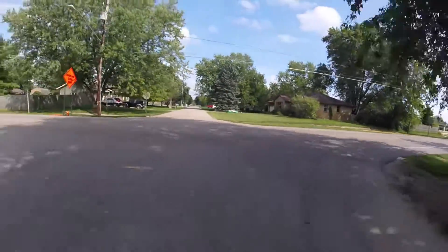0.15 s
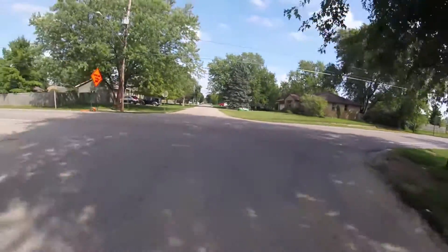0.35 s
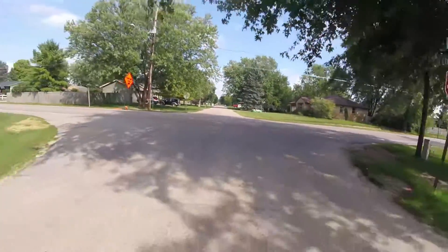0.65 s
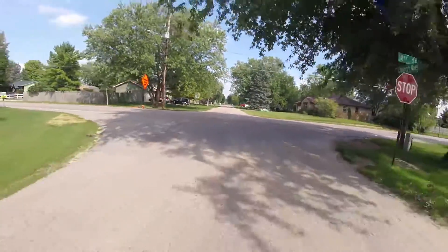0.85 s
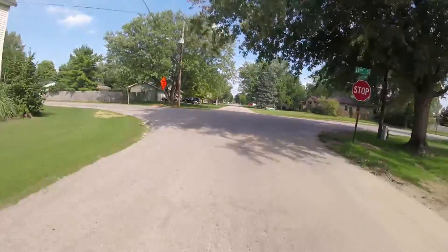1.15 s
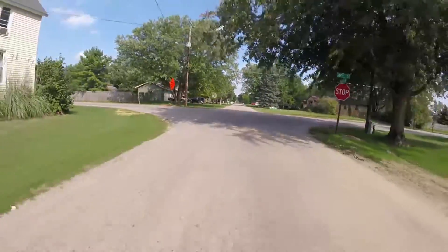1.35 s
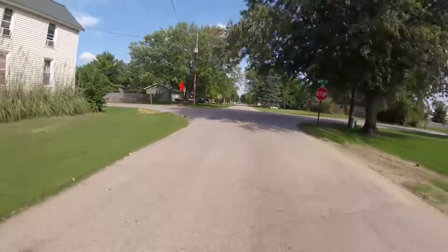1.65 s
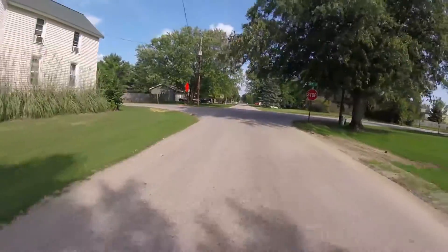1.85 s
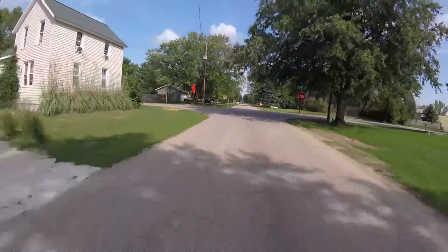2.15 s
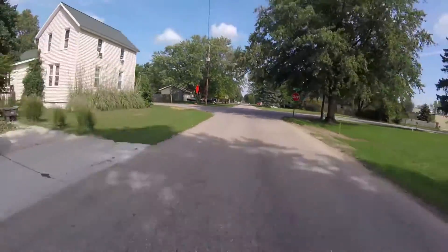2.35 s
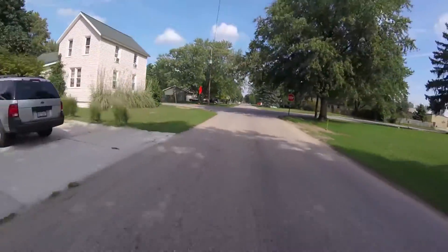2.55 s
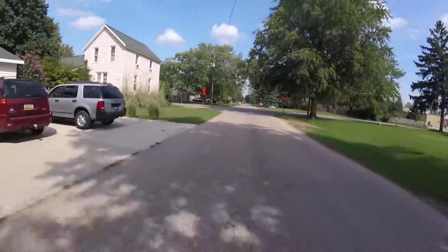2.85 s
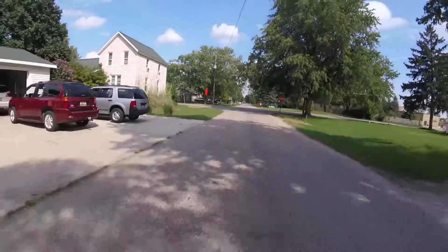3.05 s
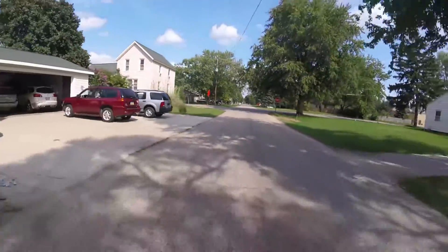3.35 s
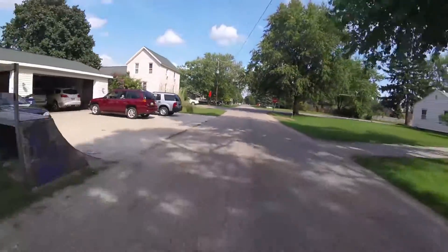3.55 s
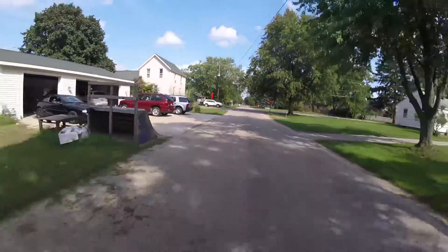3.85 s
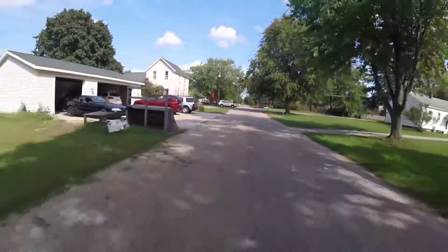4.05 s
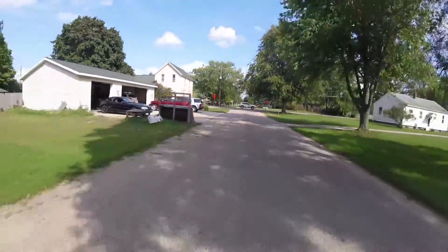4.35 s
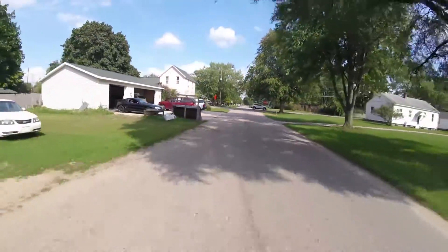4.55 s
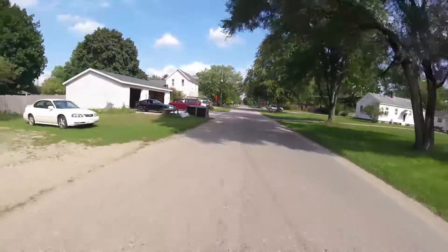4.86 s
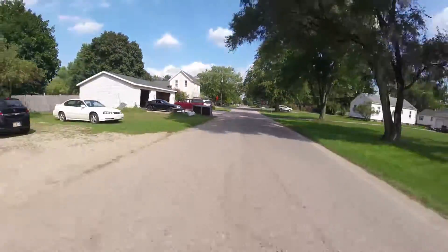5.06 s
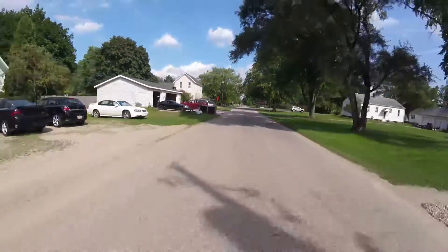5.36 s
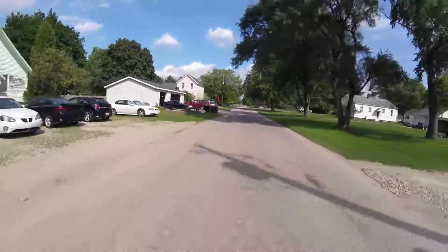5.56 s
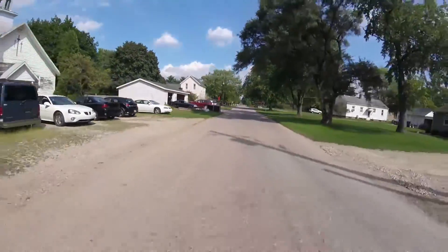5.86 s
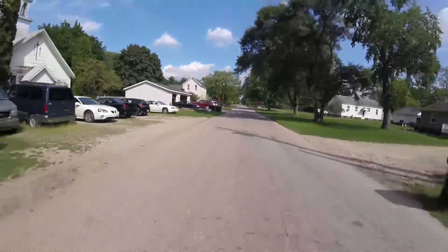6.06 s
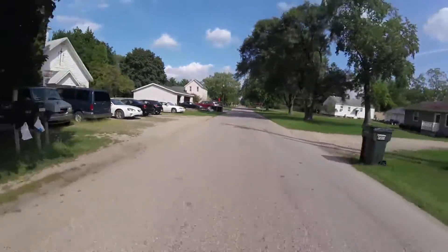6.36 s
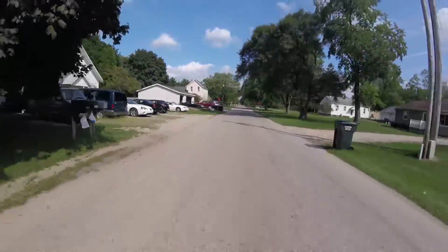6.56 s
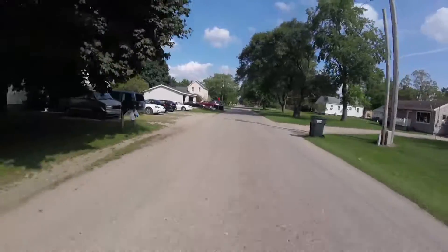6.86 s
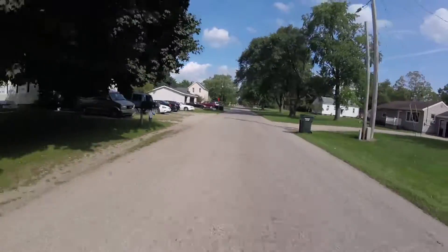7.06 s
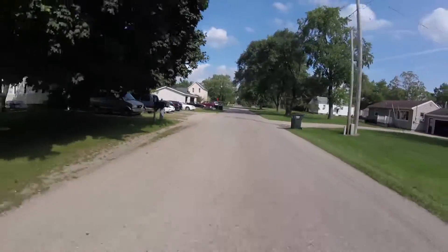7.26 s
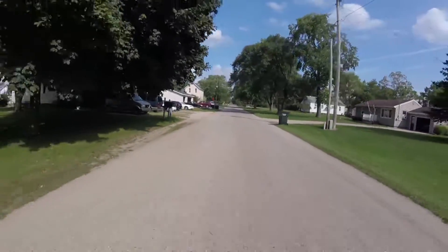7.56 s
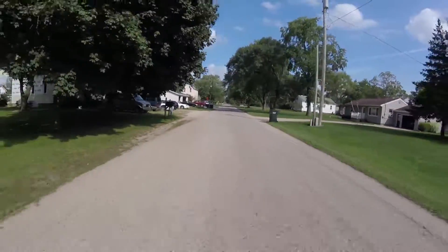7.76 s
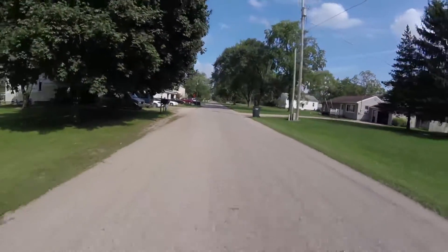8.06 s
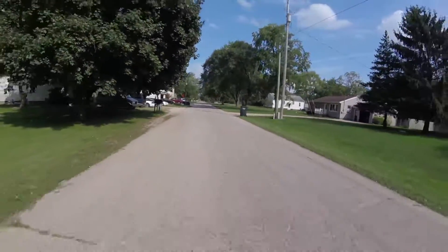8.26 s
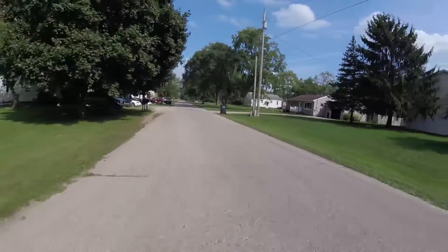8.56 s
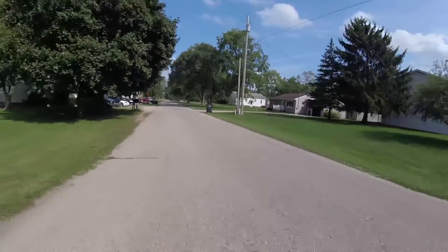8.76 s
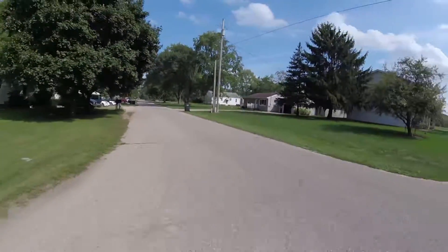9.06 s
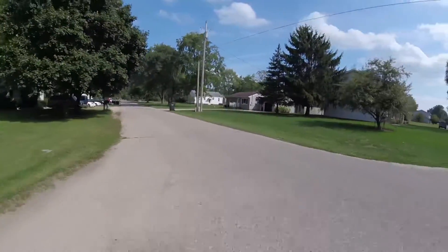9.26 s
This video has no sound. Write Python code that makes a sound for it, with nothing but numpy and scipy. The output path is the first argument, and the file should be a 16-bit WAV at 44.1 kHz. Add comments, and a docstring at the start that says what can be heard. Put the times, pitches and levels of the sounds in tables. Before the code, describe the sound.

Microphone just above a car's sports muffler outdoors: low throbbing booms with a raspy uneven bark climb in pitch, then suddenly lose force as the driver lifts off. A mellow hum returns and gradually falls lower, nearly fading before a last touch of throttle. Low wind buffeting, steady tyre roar, fine hiss and soft bumps run beneath; a few tiny chirps are barely audible.

```python
"""A village road, heard close behind the tail of a four-cylinder car and just above its sports muffler.
Each firing sends a puff down the pipe: harmonics of the firing rate boom and grow under load.
One cylinder cracks once a cycle; the throttle shuts with a sigh of air, the engine burbles down and
picks up again. Shaped noise gives tyres, wind, hiss, whirr and small bumps; sliding sines give birds."""
import sys
import numpy as np
from scipy import signal
from scipy.fft import rfft, irfft, next_fast_len
from scipy.io import wavfile
from scipy.ndimage import map_coordinates

SR = 44100
rng = np.random.default_rng(int(sys.argv[2]) if len(sys.argv) > 2 else 0)


def digitize_waveform(pressure):
    """Quantize a signal to 16-bit integers and store it at the path in sys.argv[1].

    Rows of a 2-D input are taken as channels; values are limited to [-1, 1].
    """
    field = np.atleast_2d(pressure).T
    bounded = np.clip(field, -1, 1)
    quanta = np.round(bounded * 32767).astype(np.int16)
    wavfile.write(sys.argv[1], SR, quanta)


N = 414960


def amp(db):
    """Logarithmic level: decibels to amplitude gain."""
    return 10 ** (np.asarray(db) / 20)


def unit(x):
    """Normalisation: scale to an rms of 1."""
    return x / np.sqrt(np.mean(x ** 2) + 1e-20)


def clock():
    """Sampling: the time of every sample in seconds."""
    return np.arange(N) / SR


def curve(rows):
    """Linear interpolation: one value per sample from (time, value) rows."""
    times, values = np.transpose(rows)
    return np.interp(clock(), times, values)


def wobble(rate_hz):
    """Band-limited fluctuation: a smooth random curve with rate_hz knots a second."""
    knots = rng.standard_normal(int(N * rate_hz / SR) + 4)
    return map_coordinates(knots, [clock() * rate_hz])


def filtered(x, response):
    """Linear filtering: the spectrum of x times a response of frequency."""
    size = 2 * next_fast_len(N // 2 + SR // 4)  # zero padding leaves room for the ringing
    spectrum = rfft(x, size) * response(np.fft.rfftfreq(size, 1 / SR))
    return irfft(spectrum, size)[:N]


def colour(points, hz):
    """Frequency response: gain from (Hz, dB) points on a logarithmic axis."""
    point_hz, db = np.transpose(points)
    return amp(np.interp(np.log(hz + 1), np.log(point_hz + 1), db))


def causal(gain):
    """Minimum phase: folding the cepstrum makes the response ring only after its excitation."""
    cepstrum = irfft(np.log(gain))
    half = len(cepstrum) // 2
    cepstrum[1:half] *= 2
    cepstrum[half + 1:] = 0
    return np.exp(rfft(cepstrum))


def noise(points):
    """Spectral shaping: coloured noise of rms 1."""
    white = rng.standard_normal(N)
    return unit(filtered(white, lambda hz: colour(points, hz)))


def swells(rows):
    """Amplitude envelope: one Gaussian bell per row, its length being the standard deviation."""
    total = np.zeros(N)
    for start_s, level_db, length_s in rows:
        total += amp(level_db) * np.exp(-.5 * ((clock() - start_s) / length_s) ** 2)
    return total


def impulses(times, sizes):
    """Impulsive excitation: single-sample kicks."""
    places = np.clip(np.round(times * SR).astype(int), 0, N)
    return np.bincount(places, sizes, N + 1)[:N]


# Engine speed as exhaust pulses a second; also drives the whirr: time_s, firing_hz
FIRING_RATE = [(0, 50.12), (0.4, 53.29), (1.3, 59.9), (2.3, 66.34), (3.2, 71.92), (3.8, 72.6), (4.1, 70.66),
               (4.6, 70.65), (5.45, 67.85), (6.1, 62.04), (7, 53.17), (7.5, 47.69), (8, 44.37),
               (8.4, 43.93), (9, 45.9), (9.41, 48.93)]


def exhaust(bark_db, lope, lope_lag):
    """Periodic excitation: one puff per firing; unequal cylinders sway the drone once every four."""
    rate = curve(FIRING_RATE)
    turn = np.cumsum(rate) / SR - .5  # phase counted in firings
    sway = 1 + lope * np.cos(np.pi * (turn - lope_lag) / 2)
    low = boom(turn, rate, flutter_db=0.1, lag_loaded=0.3, lag_idle=2.15)
    high = overtones(turn, rate, odd_db=-2.5, flutter_db=2.2, lag=0.52)
    crack = bark(turn, rate, scatter_db=0.66, growth=1.6, doubling_db=2, lead_s=0.00062)
    return sway * (low + high) + amp(bark_db) * crack


# Engine load as the throttle opens, shuts, barely opens and opens again; also drives the
# overtones and the bark: time_s, load_db
ENGINE_LOAD = [(0, -7), (.55, -2), (.8, -.5), (2.9, -0.2), (3.42, -3.5), (3.65, -28), (5, -27.5),
               (5.15, -16.5), (8.5, -20), (9.12, -30.5), (9.41, -3.5)]
# Strength of the exhaust puffs: time_s, firing_tone_db
PUFF_STRENGTH = [(0, -20), (.7, -18), (3.25, -18), (3.65, -26), (4.4, -23), (5.3, -17), (7.1, -17.5),
                 (8.6, -20.5), (9.15, -28.5), (9.41, -21.5)]
# Muffler chamber lifting orders two and three against the firing tone: frequency_hz, gain_db
CHAMBER_GAIN = [(88, 3.3), (101, 7), (116, 0), (132, -0.2), (143, -2), (152, -4.5), (168, -8.5), (176, -14),
                (192, -12.5), (205, -16), (218, -24.5)]
# Spells of uneven firing on the overrun: start_s (centre), level_db, length_s
BURBLE_SPELLS = [(3.6, -30, 0.1), (4.8, -30, 0.31), (7.85, -34.5, 0.46)]
BURBLE_REST_DB = -50.5  # the off-beat that is always there
SECOND_GROWTH, THIRD_GROWTH = .39, 0.62  # dB of each order per dB of load


def boom(turn, rate, flutter_db, lag_loaded, lag_idle):
    """Harmonic synthesis: load and chamber raise orders two and three; a subharmonic burbles."""
    load_db = curve(ENGINE_LOAD)
    angle = 2 * np.pi * turn
    # a loaded puff has a steep front; off throttle its overtones trail behind (radians)
    lag = np.interp(load_db, [-15, 0], [lag_idle, lag_loaded])
    # each puff pushes the air out and then sucks it back
    orders = -np.sin(angle)
    for k, growth in (2, SECOND_GROWTH), (3, THIRD_GROWTH):
        gain = amp(growth * load_db) * colour(CHAMBER_GAIN, k * rate)
        orders += gain * np.cos(k * angle - lag)
    tone = orders_with_flutter(orders, flutter_db)
    # on the overrun every other puff is the stronger one
    half = (angle + np.pi / 2) / 2
    offbeat = np.cos(3 * half) + amp(-4) * np.cos(half)
    burble = (amp(BURBLE_REST_DB) + swells(BURBLE_SPELLS)) * amp(0.64 * wobble(12)) * offbeat
    return np.sqrt(2) * (tone + burble)


def orders_with_flutter(orders, flutter_db):
    """Amplitude modulation: each low order shares the puff strength and its small flutter."""
    return orders * amp(curve(PUFF_STRENGTH) + flutter_db * wobble(30))


# Pipe resonances, the tone of a firing order at full load: frequency_hz, level_db
PIPE_RESONANCES = [(190, -40.5), (235, -31), (260, -33.5), (285, -37), (320, -43.5), (350, -52), (385, -42),
                   (402, -43), (430, -59), (480, -51.5), (520, -44.5), (560, -58), (640, -56), (760, -66.5)]


def overtones(turn, rate, odd_db, flutter_db, lag):
    """Resonance: orders four to nine swell as they glide through the pipe; odd ones are weaker."""
    out = np.zeros(N)
    for k in range(4, 10):
        gain = amp(odd_db * (k % 2)) * colour(PIPE_RESONANCES, k * rate)
        out += gain * np.cos(2 * np.pi * k * turn - lag)
    return np.sqrt(2) * out * amp(curve(ENGINE_LOAD) + flutter_db * wobble(60))


# Pressure front of each cylinder in firing order: relative_level_db
CYLINDER_FRONTS = [1.5, -21, -23, -8]
# Muffler resonances struck by the fronts: frequency_hz, relative_gain_db
MUFFLER_RINGING = [(50, -5), (170, 10), (250, 6), (320, -11), (390, 0.5), (435, -15), (510, -0.5), (660, 4),
                   (750, -6.5), (860, -5), (1000, -18), (1160, -32.5), (1340, -17), (1700, -41.5),
                   (5000, -87.5)]


def bark(turn, rate, scatter_db, growth, doubling_db, lead_s):
    """Impulse response: one steep front in four rings the muffler, harder with load and revs."""
    index = np.arange(int(turn[-1]) + 1)
    times = np.interp(index, turn, clock())
    force_db = growth * curve(ENGINE_LOAD) + doubling_db * np.log2(rate / rate.mean())
    front_db = np.take(CYLINDER_FRONTS, index, mode="wrap") + np.interp(times, clock(), force_db)
    scatter = scatter_db * rng.standard_normal(len(times))
    fronts = impulses(times - lead_s, amp(front_db + scatter))
    return unit(filtered(fronts, lambda hz: causal(colour(MUFFLER_RINGING, hz))))


# Whirr spectrum: frequency_hz, relative_db_per_hz
WHIRR_SPECTRUM = [(100, -3.5), (240, 7.5), (350, 4.5), (600, -2.5), (750, 0.5), (880, 0.5), (1040, -2),
                  (1220, -13.5), (1450, -11.5), (1900, -25), (3000, -25.5), (6000, -50), (12000, -79)]
WHIRR_DB, WHIRR_DB_PER_DOUBLING = -41.5, 12  # level at mean revs, and its rise with revs


def whirr():
    """Power-law scaling: the level of the engine's broadband whirr follows its revs."""
    rate = curve(FIRING_RATE)
    revs = np.log2(rate / rate.mean())
    return amp(WHIRR_DB + WHIRR_DB_PER_DOUBLING * revs + 0.53 * wobble(25)) * noise(WHIRR_SPECTRUM)


def sigh(level_db, length_s):
    """Turbulent jet noise: intake air escapes as the throttle shuts."""
    spectrum = [(800, -18), (1800, 3.5), (3000, 1), (4200, -1.5), (5000, -21), (9000, -28), (13000, -27.5)]
    return swells([(3.35, level_db, length_s)]) * noise(spectrum)


# Tyre roar on the changing road surface: time_s, relative_level_db
SURFACE_ROAR = [(0, -60), (1.6, -63.5), (3.8, -58.5), (5.4, -58), (6.7, -57), (7.7, -61), (8.1, -64),
                (8.45, -60.5), (9.1, -60), (9.41, -57.5)]
# Tyre spectrum: frequency_hz, relative_db_per_hz
TYRE_SPECTRUM = [(200, 1), (700, -2), (1000, 7.5), (1250, 6), (1500, 3.5), (2100, 1.5), (2600, -4),
                 (3600, -3.5), (4400, -9), (6000, -17.5), (12000, -51.5)]


def tyres(tyre_db):
    """Rolling noise: the road surface sets the level of a broadband roar."""
    return amp(curve(SURFACE_ROAR) + tyre_db + 0.49 * wobble(25)) * noise(TYRE_SPECTRUM)


# Rough patches that scuff the tyres: start_s (centre), relative_level_db, length_s
ROUGH_PATCHES = [(8.805, -50, 0.003), (8.85, -55.5, 0.08), (8.965, -49, 0.0079), (9.27, -51, 0.056)]


def scuffs(grain_db):
    """Friction noise: rough patches give short bursts with a fast random grain."""
    spectrum = [(300, -19), (1000, 10.0), (2200, -1.5), (3800, -16.0), (6000, -23.0), (13000, -28.5)]
    return swells(ROUGH_PATCHES) * amp(grain_db * wobble(250)) * noise(spectrum)


# Grit flicked by the tyres: start_s, relative_peak_db
GRIT_TICKS = [(3.7483, -50.5), (4.2192, -50.5), (4.2368, -47.5), (4.6794, -54.5), (7.9149, -54.5)]


def grit(level_db, t60_s):
    """Impact and exponential decay: small stones tick against the car."""
    times, db = np.transpose(GRIT_TICKS)
    t = np.arange(SR // 20) / SR
    decay = amp(-60 * t / t60_s)
    envelope = signal.fftconvolve(impulses(times, amp(db + level_db)), decay)[:N]
    return envelope * noise([(1000, -4.5), (4000, 4.5), (7000, 1.5), (11000, -20), (14000, -8.0)])


# Bumps that shake the body: start_s (centre), level_db, length_s
BODY_BUMPS = [(2.43, -26, 0.02), (4.9, -24.5, 0.088), (6.66, -19, 0.033), (7.25, -20, 0.0095),
              (7.42, -19, .035), (7.92, -21, 0.097), (8.21, -15.5, 0.017)]


def bumps():
    """Structural vibration: bumps shake the body in bursts of low noise."""
    spectrum = [(10, -34.5), (35, 9.5), (70, 7.5), (140, -3.5), (250, -15.5), (400, -26.5), (1500, -74.0)]
    return swells(BODY_BUMPS) * noise(spectrum)


# Wind tumbling behind the car: time_s, level_db
WIND_LEVEL = [(0, -28.5), (1.6, -31), (3.1, -27), (3.8, -29), (5.1, -24.5), (6.2, -27.5), (7.7, -27),
              (9, -29.5), (9.41, -29.5)]
# Wind spectrum: frequency_hz, relative_db_per_hz
WIND_SPECTRUM = [(8, -18.5), (20, -10), (35, -2), (65, -4), (110, -6.5), (160, -7), (240, -16.5),
                 (320, -25.5), (600, -36), (2000, -77.5)]


def wind(lumps_db):
    """Turbulent wake: low noise with random lumps tumbles behind the car."""
    return amp(curve(WIND_LEVEL) + lumps_db * wobble(30)) * noise(WIND_SPECTRUM)


# Road speed: time_s, share_of_top_speed
ROAD_SPEED = [(0, 0.72), (1.7, .56), (4.4, 0.81), (6.6, 0.95), (9.41, 0.85)]
# Air hiss spectrum: frequency_hz, relative_db_per_hz
HISS_SPECTRUM = [(500, 5.5), (3500, 3.5), (4500, -1.5), (5600, 0.5), (6150, 5.5), (6500, 14.5), (6900, 6.5),
                 (8000, 5), (9200, 1), (10200, -8), (11700, -4.5), (13000, -12.5), (13900, -29)]
AIR_DB, AIR_DB_PER_DOUBLING = -64, 8  # level at top speed, and its rise with speed


def air_hiss():
    """Flow noise: the level of the hiss rises with the logarithm of road speed."""
    speed = np.log2(curve(ROAD_SPEED))
    return amp(AIR_DB + AIR_DB_PER_DOUBLING * speed + .3 * wobble(30)) * noise(HISS_SPECTRUM)


# Birds by the roadside: start_s (centre), relative_level_db, pitch_hz (at the centre)
BIRD_CHIRPS = [(.13, -73, 4700), (.2, -72, 4700), (3.761, -67, 4400), (3.787, -66, 4700),
               (3.833, -59, 4480), (4.19, -67, 4450), (4.535, -67, 4400), (4.58, -66, 4400)]


def chirps(level_db, length_s, fall):
    """Frequency modulation: short bell-shaped whistles slide downwards."""
    out = np.zeros(N)
    for start_s, db, pitch_hz in BIRD_CHIRPS:
        near = np.abs(clock() - start_s) < .04
        t = clock()[near] - start_s
        whistle = np.sin(2 * np.pi * pitch_hz * (t - fall * t * t))
        out[near] += amp(db + level_db) * np.exp(-.5 * (t / length_s) ** 2) * whistle
    return out


def scene():
    """Superposition: the exhaust over the engine's other sounds, the road, the air and the birds."""
    engine = exhaust(bark_db=-39.0, lope=0.13, lope_lag=0.3) + whirr() + sigh(level_db=-54.5, length_s=0.06)
    road = tyres(tyre_db=3.5) + scuffs(grain_db=4.5) + grit(level_db=-1.5, t60_s=.02) + bumps()
    air = wind(lumps_db=1.5) + air_hiss()
    birds = chirps(level_db=1.5, length_s=0.0071, fall=1.6)
    return (engine + road + air + birds)[None]


TOP_HZ = 13910


def record(dry):
    """Band limitation: nothing at or above TOP_HZ passes."""
    return filtered(dry[0], lambda hz: hz < TOP_HZ)[None]


dry = scene()
out = record(dry)
digitize_waveform(out)
```